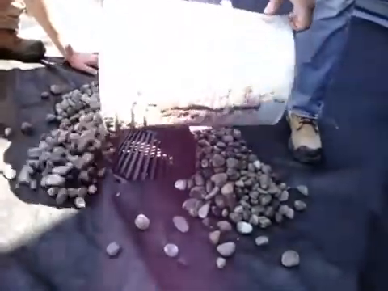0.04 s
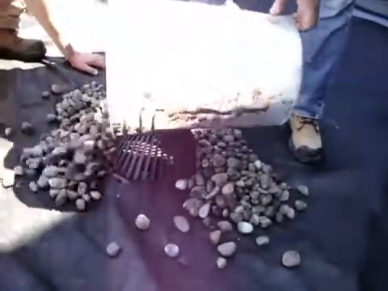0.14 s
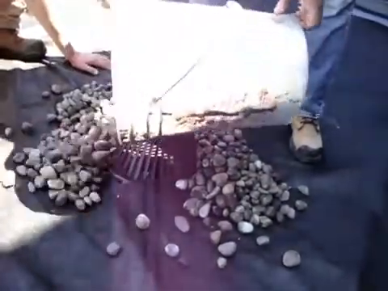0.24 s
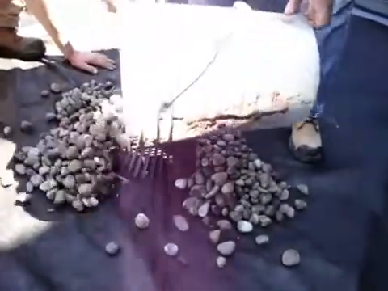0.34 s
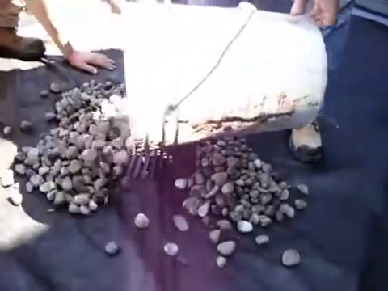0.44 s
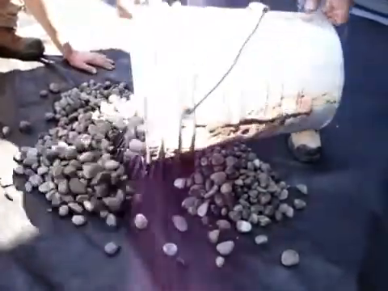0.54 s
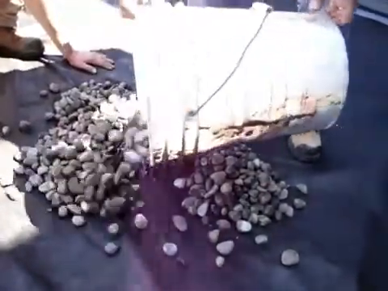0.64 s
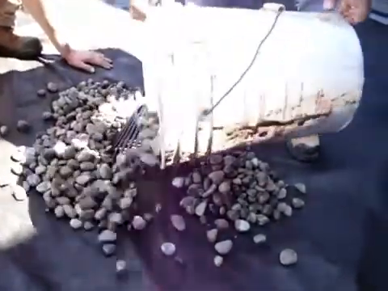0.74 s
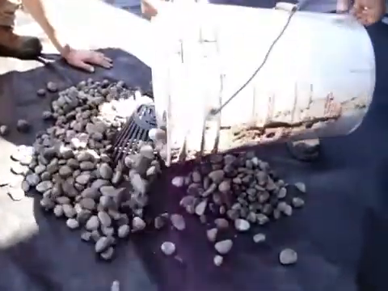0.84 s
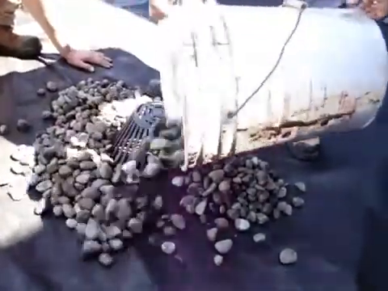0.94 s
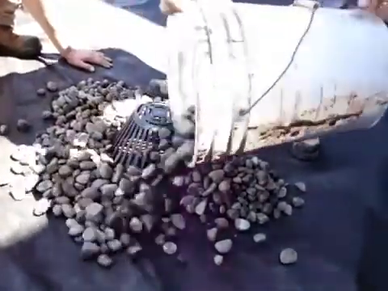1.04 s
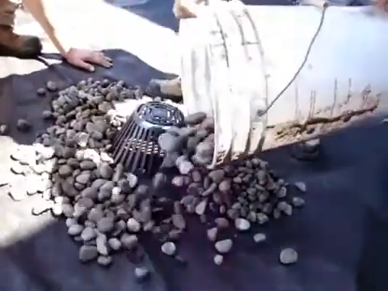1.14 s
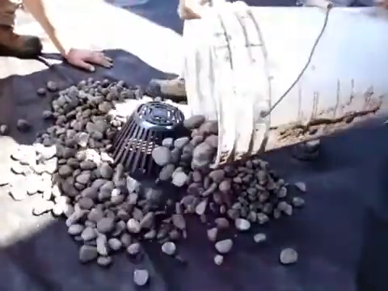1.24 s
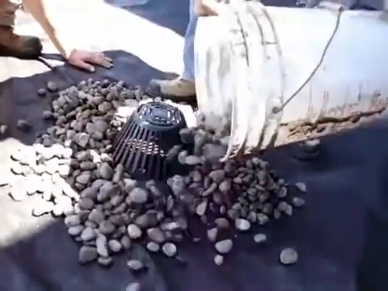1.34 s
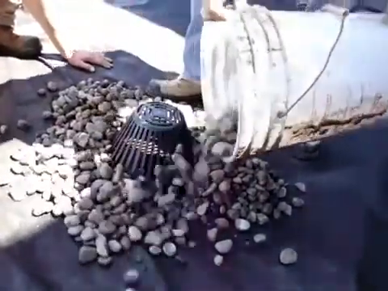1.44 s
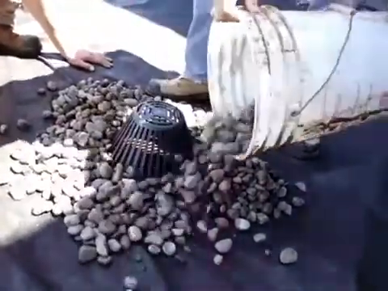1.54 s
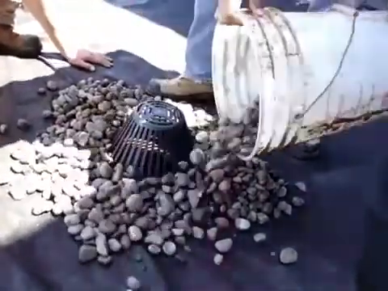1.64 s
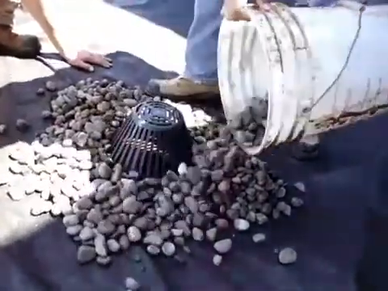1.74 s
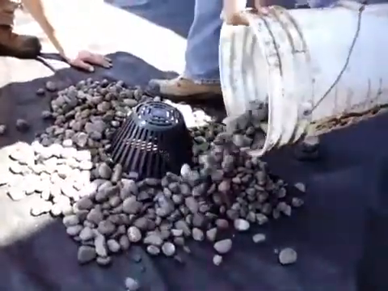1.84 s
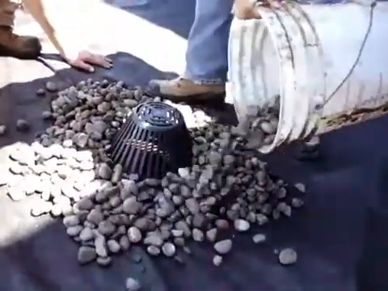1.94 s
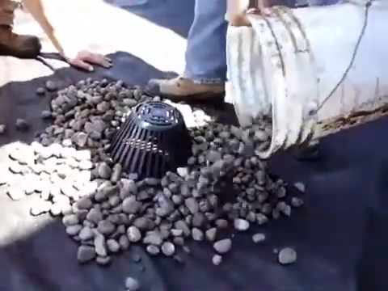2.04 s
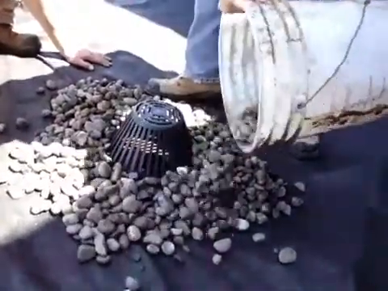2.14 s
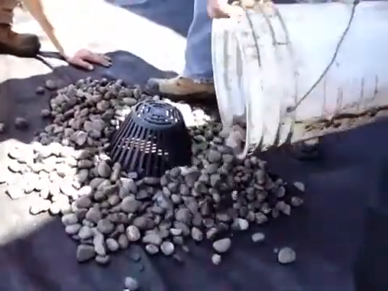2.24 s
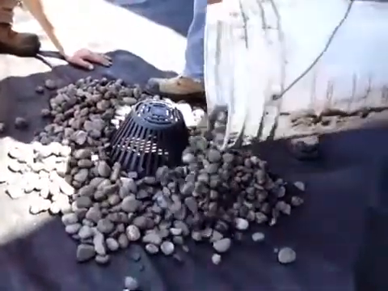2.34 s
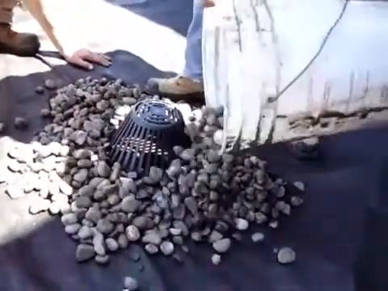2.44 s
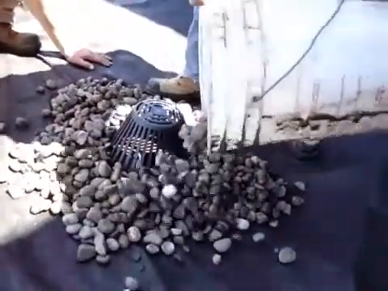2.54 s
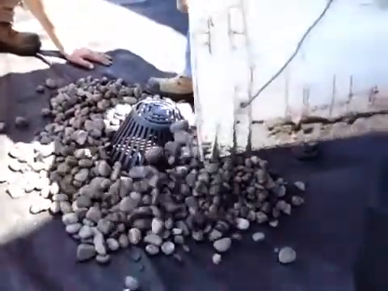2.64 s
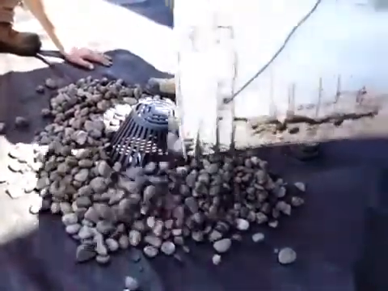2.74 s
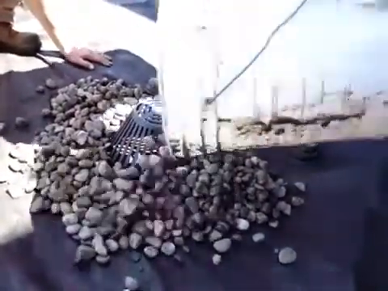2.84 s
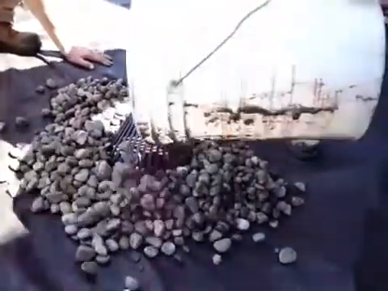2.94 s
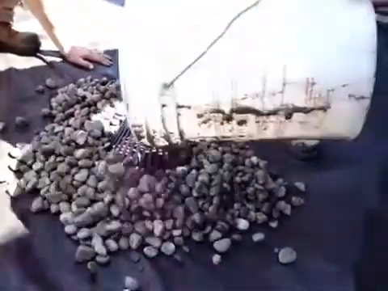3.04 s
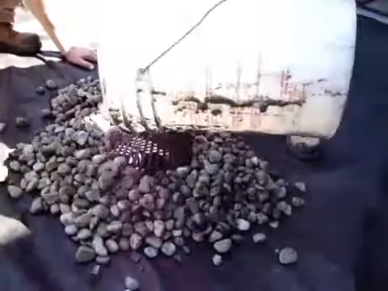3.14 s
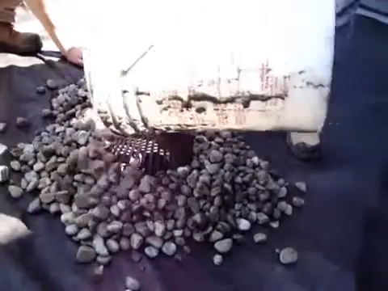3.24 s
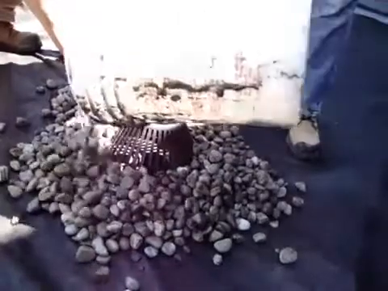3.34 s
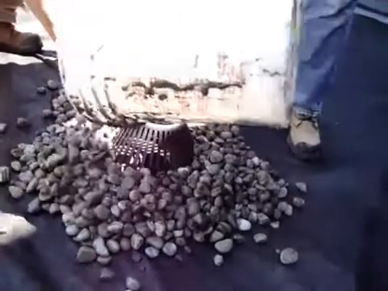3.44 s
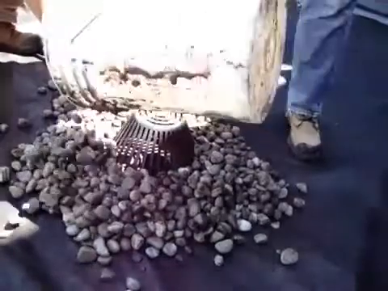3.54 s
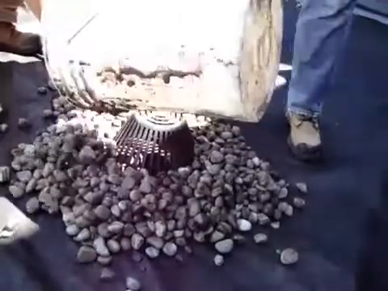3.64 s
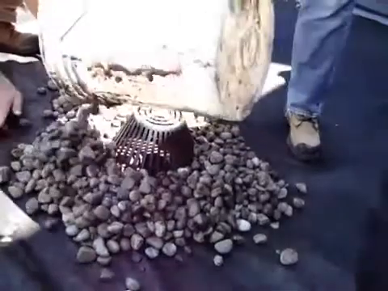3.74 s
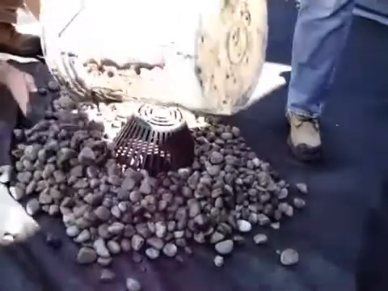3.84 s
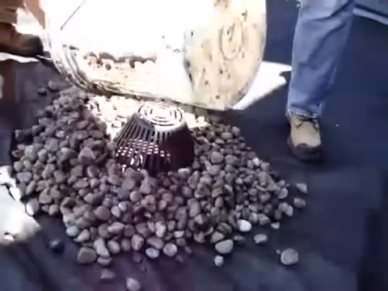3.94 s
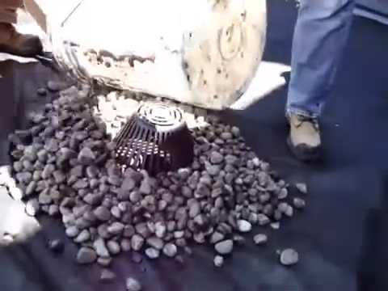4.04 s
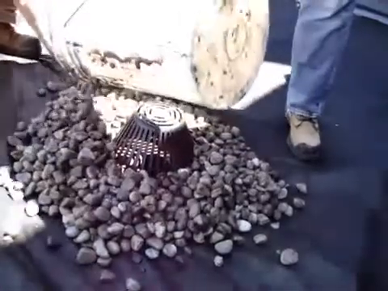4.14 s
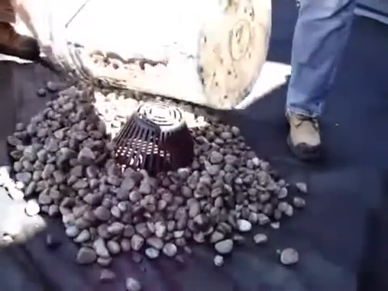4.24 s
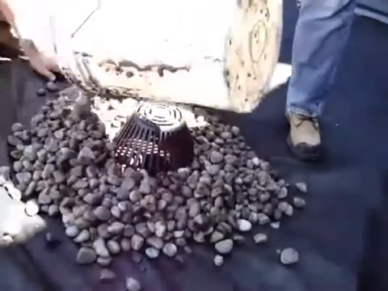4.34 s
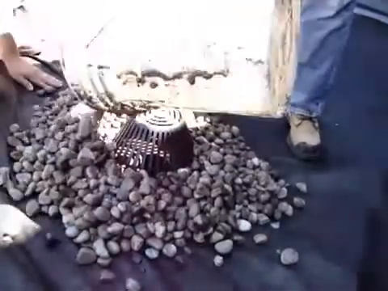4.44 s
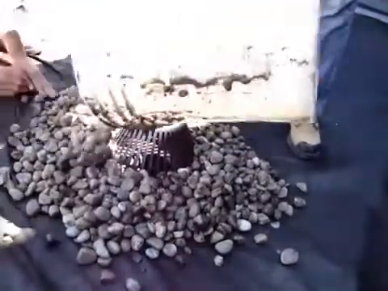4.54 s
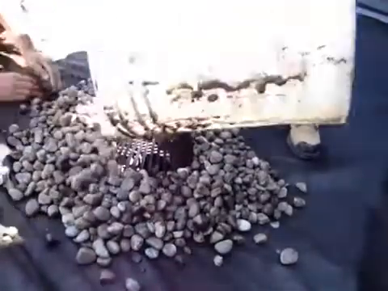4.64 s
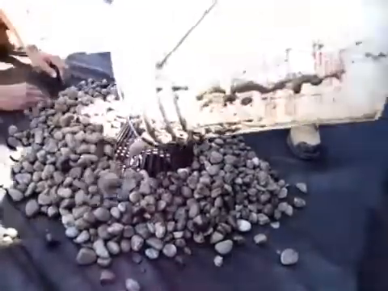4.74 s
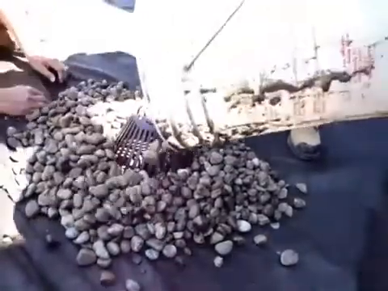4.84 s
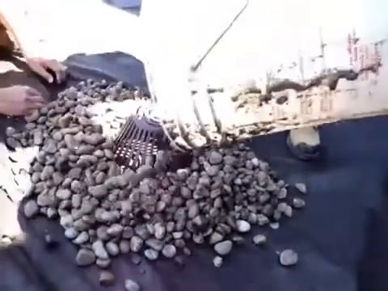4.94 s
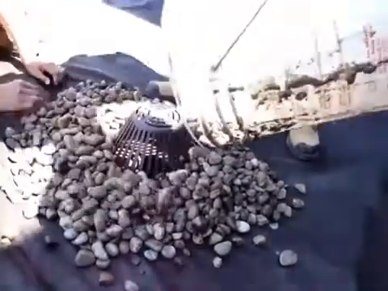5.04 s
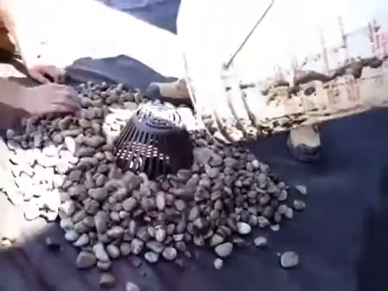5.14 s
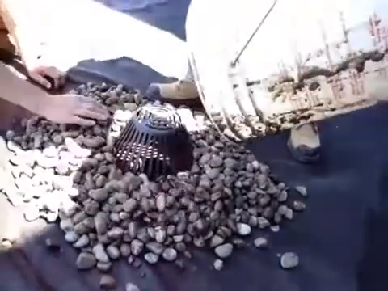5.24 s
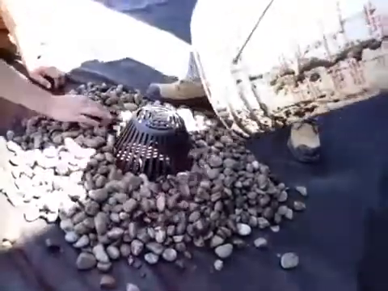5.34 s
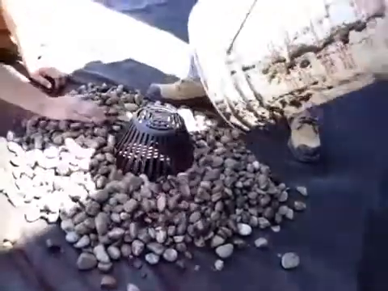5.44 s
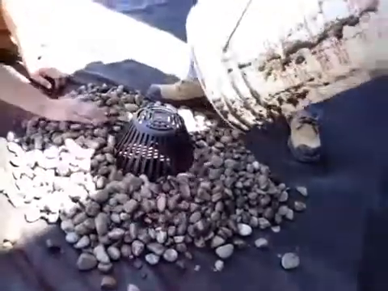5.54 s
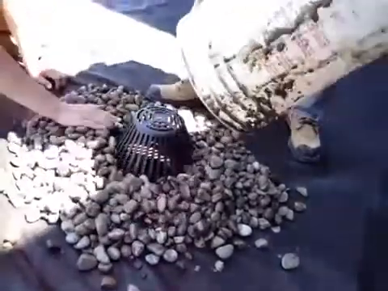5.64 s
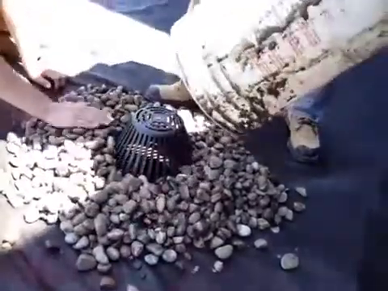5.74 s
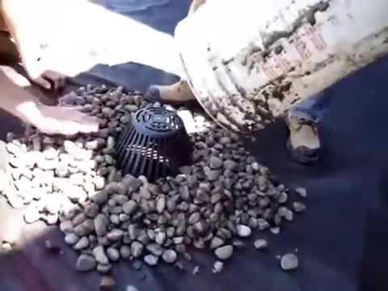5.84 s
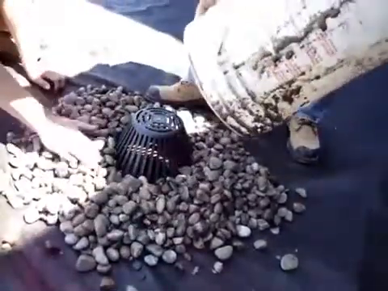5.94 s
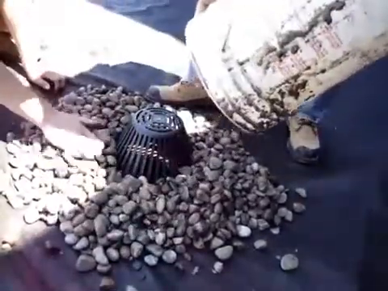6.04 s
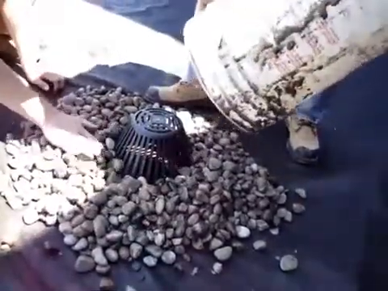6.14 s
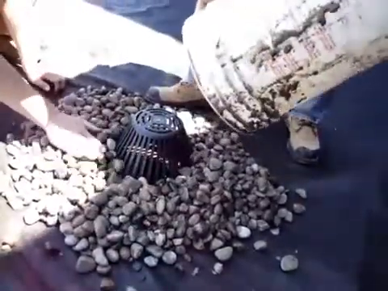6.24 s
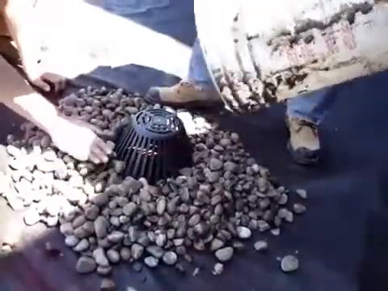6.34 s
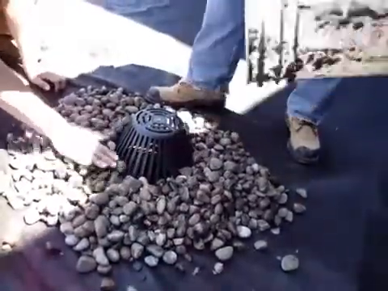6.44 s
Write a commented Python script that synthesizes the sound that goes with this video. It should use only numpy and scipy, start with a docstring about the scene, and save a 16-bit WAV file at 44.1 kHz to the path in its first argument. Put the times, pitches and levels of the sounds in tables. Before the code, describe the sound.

Already under way, a heavy pour of pebbles rattles over a plastic bucket's lip and lands on other stones with hard, sharp clacks. Plastic tocks and hollow rumbling come in bursts, strongest early, near two and a half seconds and just past four. The clatter dwindles to stray clicks, then the bucket is shaken, spitting out dry grit. Close microphone, open air, almost no echo, dull extreme top.

```python
"""Outdoors, round a drain: river stones slide out of a tilted plastic bucket and clatter onto a pile.
Bucket: random touches ring patches of wall as the load surges; single stones knock; shaken grit ends it.
Pile: sharp contact pulses with scatter make the clatter and hard clacks; sparse narrow ticks lie on top.
Ground: low noise follows the clatter; clumps thump. Behind: short scatter, air noise and a faint hum.
"""
import sys
import numpy as np
from scipy import signal
from scipy.fft import rfft, irfft
from scipy.io import wavfile
from scipy.ndimage import uniform_filter1d

SR = 44100
rng = np.random.default_rng(int(sys.argv[2]) if len(sys.argv) > 2 else 0)


def dump_mix(stems):
    """Bounce the given channels to the path in sys.argv[1] as a 16-bit WAV at rate SR."""
    frames = np.atleast_2d(stems).T  # one column per channel
    limited = np.clip(frames, -1, 1)  # hard clip at full scale
    pcm = np.round(limited * 32767).astype(np.int16)
    wavfile.write(sys.argv[1], SR, pcm)


N = 287071
TIME_S = np.arange(N) / SR

# steady flow over the bucket lip: start_s, level_db
BUCKET_FLOW = [(0.0, -33), (0.34, -36), (0.58, -35), (1.25, -33.5), (1.61, -42), (2.28, -45), (2.46, -28.5),
               (2.81, -39), (3.22, -37), (3.62, -45), (4.22, -30), (4.33, -30.5), (4.56, -37),
               (5.14, -39.5), (5.79, -51), (5.94, -43.5), (6.12, -38.5), (6.5, -39.5)]
FLOW_RUMBLE_DB, FLOW_SCRAPE_DB = -1.04, -3.36  # added to the flow level for each layer
# load slips and sticks again: crest_s, rumble_db, scrape_db, half_length_s
LOAD_SLIPS = [(0.243, -37, -44, 0.022), (0.46, -34.5, -34.5, 0.059), (0.607, -36, -32, 0.072),
              (0.757, -31, -46, 0.032), (0.854, -29.5, -49, 0.0068), (0.936, -29, -39, 0.022),
              (1.003, -40, -36.5, 0.051), (1.204, -34.5, -33.5, 0.058), (1.346, -27, -25.5, 0.0052),
              (1.454, -31.5, -37, 0.01), (1.64, -38, -39, 0.043), (1.88, -36.5, -34.5, 0.06),
              (2.055, -37, -38, 0.051), (2.292, -29.5, -31.5, 0.04), (2.46, -29.5, -33, 0.064),
              (2.662, -30.5, -33, 0.013), (2.913, -45, -61, 0.015), (3.054, -32.5, -33, 0.033),
              (3.265, -35.5, -35, 0.037), (3.458, -33.5, -35, 0.028), (3.673, -35.5, -39, 0.049),
              (3.866, -33.5, -33, 0.055), (4.024, -30.5, -31.5, 0.037), (4.415, -35.5, -36.5, 0.091),
              (4.848, -40, -38, 0.022), (5.356, -41.5, -46, 0.045), (5.565, -44.5, -41.5, 0.063),
              (5.633, -42, -40, 0.02), (5.755, -44.5, -45.5, 0.028)]
# wall pitch, low under a heavy load, high where stones run fast over the bare lip: time_s, pitch_hz
WALL_PITCH_CURVE = [(0, 860), (.7, 910), (1.3, 1000), (1.9, 1090), (2.3, 1130), (2.5, 1200), (2.9, 910),
                    (3.5, 960), (4.1, 940), (4.7, 1030), (6.5, 990)]
# hollowness as the bucket turns and empties: time_s, ringing_db
HOLLOW_CURVE = [(0, -48), (2.2, 9), (2.5, -3), (3.2, -17), (3.7, 11.5), (4.1, 5.5), (4.45, -2), (4.7, -15),
                (6.5, -24)]
# air modes of the bucket: pitch_hz, width_hz, gain_db
BUCKET_MODES = [(200, 6, 0), (597, 350, -8.5), (1000, 120, 2), (1400, 330, -8), (1610, 70, 1.5),
                (2030, 89, -4.5), (2657, 76, -9), (2980, 33, -17), (3750, 120, -34)]
# colour of the rumble on the wall: freq_hz, density_db
RUMBLE_SPECTRUM = [(30, -47.5), (110, -28.5), (165, -22), (205, -15), (290, -14.5), (420, -6.5),
                   (530, -4.5), (680, -1.5), (1000, -3.5), (1350, 1), (1800, -15.5), (3000, -31),
                   (8000, -41)]
# colour of the scraping: freq_hz, density_db
SCRAPE_SPECTRUM = [(150, -49), (600, -54.5), (1100, 11), (1500, 13), (2100, 15.5), (2900, 12.5), (4500, 7),
                   (7000, -86), (10000, -33)]
# stone on bucket wall: start_s, level_db, pitch_hz, cycles_to_crest
WALL_KNOCKS = [(0.052, -15.5, 834, 1.3), (.203, -19.5, 834, 1.4), (0.227, -16, 1270, 2.5),
               (.374, -15.5, 784, 0.64), (.473, -15.5, 1094, 2.3), (.551, -18, 696, 1),
               (.567, -14.5, 674, 2), (.574, -8, 835, 1.2), (.577, -17, 1390, 3), (.591, -16, 825, 1.1),
               (.609, -12, 777, 1.9), (.652, -25, 804, 1.2), (.68, -16.5, 794, 1.7), (.712, -18, 825, 2.1),
               (.755, -20, 764, 1.8), (.757, -22, 1500, 2), (.766, -16.5, 715, 0.99),
               (0.923, -12, 1970, 1.8), (0.928, -13, 1540, 1.6), (.928, -16, 860, 2.2),
               (.943, -24.5, 690, 2.5), (1.062, -19, 1030, 1.8), (1.138, -14, 810, 1.3),
               (1.174, -15.5, 1050, 1.2), (1.182, -17, 780, 1.7), (1.216, -20, 810, 1.7),
               (1.243, -17, 1310, 1.3), (1.339, -17, 1330, 2.1), (1.389, -18.5, 846, 2.1),
               (1.556, -16.5, 940, 1.6), (1.606, -21.5, 1300, 1.9), (2.14, -16.5, 1610, 0.94),
               (2.421, -16, 1350, 1.1), (2.443, -13, 1360, 1.1), (2.459, -13, 1160, 0.9),
               (2.487, -14, 1400, 1.3), (2.494, -12.5, 1890, 1.5), (2.496, -16, 1000, 1.5),
               (3.366, -24, 607, 1.3), (3.566, -18.5, 587, 0.77), (4.396, -16, 1036, 3.9),
               (5.259, -19.5, 1220, 1.6), (5.873, -26, 1030, 2.1), (5.984, -20, 923, 1.2),
               (6.189, -15, 1500, 1.2), (6.349, -11, 2720, 1.4), (6.351, -20, 1000, 3.7),
               (6.358, -23, 2050, 4), (6.408, -29, 460, 0.93)]
# shakes of the bucket: crest_s, level_db, swell_s, fade_s, bucket_ring_db
BUCKET_SHAKES = [(5.642, -33.5, 0.0058, 0.016, -1), (5.868, -32, 0.0054, 0.0057, 12),
                 (5.882, -30.5, 0.0068, 0.0063, 14), (5.986, -28.5, 0.017, 0.0072, 9.5),
                 (6.075, -32, 0.03, 0.026, 8), (6.124, -35, 0.0063, 0.0044, -4),
                 (6.188, -27, 0.01, 0.0082, -2), (6.265, -33, 0.0022, 0.0035, -2),
                 (6.306, -28, 0.0021, 0.0055, -16), (6.32, -28.5, 0.0031, 0.0058, 6),
                 (6.348, -24.5, 0.002, 0.007, 7), (6.485, -38.5, 0.0037, 0.024, -2)]
# colour of the shaken grit: freq_hz, density_db
GRIT_SPECTRUM = [(50, -25), (200, -25), (450, -11.5), (800, -7.5), (2000, -0.5), (4500, 3), (7000, -1.5),
                 (10000, -10.5)]

# hardest hits of stone on stone: start_s, level_db, pitch_hz
STONE_CLACKS = [(0.014, -8, 5850), (0.041, -14, 5970), (0.0778, -4, 5000), (0.0847, -14.5, 5170),
                (0.1373, -9, 5530), (0.167, -10, 4500), (0.176, -12, 5900), (0.2005, -7, 5500),
                (0.2343, -15, 5200), (0.286, -10.5, 4830), (0.3135, -11, 5140), (0.3457, -9, 5040),
                (0.3616, -13.5, 5500), (0.365, -8, 5100), (0.398, -9.5, 4850), (0.429, -17, 5200),
                (0.4925, -16, 5000), (0.5077, -6.5, 4800), (0.5197, -7, 4800), (0.5392, -10.5, 4600),
                (0.5537, -11.5, 5000), (0.5667, -15, 4540), (0.5846, -8, 5470), (0.608, -10.5, 4690),
                (0.6408, -12.5, 5250), (0.676, -9.5, 4480), (0.7074, -14, 5500), (0.733, -12.5, 5610),
                (0.745, -11, 5230), (0.7535, -10, 5450), (0.761, -6.5, 4500), (0.785, -11.5, 4880),
                (0.7957, -7, 5500), (0.818, -11.5, 4340), (0.842, -18, 5290), (0.8506, -18, 5240),
                (0.881, -13.5, 5800), (0.8963, -12, 5310), (0.9224, -8.5, 5350), (0.929, -14, 4360),
                (0.9427, -12, 4420), (0.9665, -8.5, 5300), (0.9893, -12.5, 4810), (1.062, -10.5, 5500),
                (1.0683, -10, 5070), (1.1237, -6, 4200), (1.1383, -10, 4810), (1.1503, -13, 5200),
                (1.2056, -10, 4140), (1.2252, -19, 4800), (1.2666, -10.5, 4160), (1.2914, -6.5, 4660),
                (1.306, -11, 4600), (1.328, -7.5, 5660), (1.3324, -10, 6090), (1.3523, -8.5, 4940),
                (1.3614, -7.5, 5090), (1.368, -14.5, 5200), (1.385, -9, 4900), (1.405, -9.5, 5050),
                (1.434, -12, 4320), (1.4577, -15, 4600), (1.4665, -15.5, 5790), (1.4734, -9.5, 5060),
                (1.494, -13, 4860), (1.5198, -9.5, 5750), (1.537, -17, 5130), (1.5517, -11, 5500),
                (1.5578, -17.5, 6950), (1.6395, -10.5, 5000), (1.664, -18, 4940), (1.716, -17.5, 5500),
                (1.7295, -8.5, 5700), (1.7435, -21.5, 5700), (1.749, -9.5, 6230), (1.779, -11.5, 4800),
                (1.8175, -9, 4600), (1.8635, -12, 5600), (1.875, -14, 5200), (1.9374, -9, 4530),
                (1.9491, -8.5, 3900), (1.9605, -22, 5040), (1.9811, -11, 5770), (2.004, -10.5, 6200),
                (2.0786, -13, 5330), (2.098, -17.5, 4340), (2.139, -9, 4820), (2.1516, -9.5, 5300),
                (2.178, -13.5, 4670), (2.1966, -9.5, 5530), (2.209, -12, 4750), (2.4092, -11, 4800),
                (2.5057, -15.5, 6900), (2.532, -11, 4770), (2.5453, -13, 5170), (2.5706, -15.5, 5240),
                (2.6122, -8.5, 4930), (2.6192, -5.5, 4740), (2.6445, -17, 5970), (2.6853, -15.5, 5270),
                (2.695, -17.5, 6030), (2.7015, -15, 5140), (2.7092, -12.5, 5800), (2.758, -8.5, 5070),
                (2.763, -12.5, 5700), (2.782, -9.5, 4830), (2.7955, -7.5, 5170), (2.8033, -11, 5600),
                (2.8153, -16, 5470), (2.845, -18, 5100), (2.8861, -16, 4660), (2.9415, -8, 4960),
                (2.97, -17.5, 5530), (2.9873, -11.5, 4900), (2.997, -11.5, 5170), (3.0833, -12.5, 5840),
                (3.127, -14.5, 5770), (3.153, -14.5, 6000), (3.162, -11.5, 4860), (3.178, -10.5, 4100),
                (3.188, -10.5, 6000), (3.2124, -10, 5500), (3.2281, -15, 5800), (3.252, -9, 5500),
                (3.261, -17.5, 6150), (3.279, -8.5, 6330), (3.293, -13, 5200), (3.3447, -13.5, 6640),
                (3.368, -13, 5600), (3.3725, -13, 5200), (3.4269, -10, 5800), (3.4504, -12.5, 5350),
                (3.4778, -11.5, 5700), (3.5, -14, 5800), (3.5327, -12.5, 5760), (3.55, -11, 5060),
                (3.5565, -19, 4880), (3.606, -14, 6060), (3.6705, -9, 5790), (3.7403, -9, 4700),
                (3.7618, -8.5, 4400), (3.799, -11.5, 5000), (3.829, -16, 4900), (3.9, -17.5, 4230),
                (3.9256, -12, 4730), (3.9599, -8.5, 3840), (4.0386, -13.5, 4770), (4.057, -13, 4800),
                (4.073, -8.5, 5600), (4.1125, -15.5, 5400), (4.119, -6.5, 5650), (4.1342, -7.5, 5600),
                (4.174, -8, 3950), (4.23, -10, 4800), (4.245, -17, 5320), (4.2722, -10, 5220),
                (4.2952, -4.5, 4630), (4.323, -13, 5480), (4.338, -7, 4480), (4.411, -6.5, 6000),
                (4.4726, -11, 5160), (4.508, -9, 5860), (4.525, -18, 5100), (4.5451, -7.5, 5040),
                (4.58, -18, 4470), (4.6253, -19, 5170), (4.6397, -14.5, 5170), (4.6725, -8.5, 5900),
                (4.7122, -13.5, 5590), (4.718, -17.5, 6540), (4.732, -12.5, 6000), (4.7596, -10, 4380),
                (4.7728, -13.5, 5530), (4.7968, -9, 5040), (4.8074, -13, 4830), (4.8288, -20, 4810),
                (4.833, -12.5, 5400), (4.8498, -14.5, 4980), (4.8737, -9.5, 3980), (4.8835, -12, 5600),
                (4.896, -14, 4210), (4.913, -16, 5700), (4.9463, -11, 5350), (4.9618, -19, 5170),
                (4.9788, -15, 6430), (4.9927, -13.5, 5330), (5.0112, -14.5, 6000), (5.0401, -8, 5000),
                (5.0774, -16.5, 6700), (5.0983, -14, 6760), (5.107, -13.5, 6600), (5.131, -20, 6000),
                (5.1565, -15.5, 4020), (5.1848, -14, 5760), (5.22, -10.5, 4580), (5.25, -10, 4240),
                (5.2835, -18, 5700), (5.301, -11, 4870), (5.3556, -12, 7140), (5.385, -30, 4500),
                (5.4545, -17, 3400), (5.5386, -10.5, 5450), (5.5666, -9.5, 5440), (5.5964, -21.5, 4150),
                (6.1263, -17, 4960), (6.2655, -18.5, 4520), (6.3057, -18, 3770), (6.3452, -14, 4800),
                (6.482, -15.5, 6100)]
RING_DB, RING_S = -13.5, 0.0015  # ring of the hollow between stones: level re the hit, decay
BOUNCE_DB, BOUNCE_S = -15.5, (0.00034, 0.00086)  # off the pile: level re the pulse, delay range
NEAR_DB, NEAR_S = -9.5, 0.0006  # scatter among the nearest stones: level, decay
FAR_DB, FAR_S = -19.5, 0.004  # scatter across the whole pile: level, decay
FAR_SPREAD_DB = 4  # far scatter level varies at random from snap to snap, -0.5 to 1.5 times this
BAND_SHIFT_OCTAVES, BAND_RELATIVE_WIDTH = 0.55, 0.33  # scatter band re the snap pitch

# batches of stones spilling onto the pile: start_s, length_s, clatter_db
PILE_SPILLS = [(0.0, 0.032, -22.5), (0.15, 0.101, -27.5), (0.265, 0.15, -30.5), (0.466, 0.05, -32.5),
               (0.608, 0.042, -26), (0.716, 0.098, -28.5), (0.84, 0.0083, -18), (0.896, 0.067, -25.5),
               (0.99, 0.091, -33), (1.097, 0.14, -27.5), (1.251, 0.032, -30), (1.35, 0.025, -33),
               (1.406, 0.161, -30.5), (1.578, 0.11, -33.5), (1.707, 0.071, -31), (1.813, 0.1, -34.5),
               (1.938, 0.078, -32.5), (2.026, 0.037, -33.5), (2.151, 0.033, -34), (2.25, 0.071, -32.5),
               (2.437, 0.08, -27), (2.565, 0.086, -25), (2.681, 0.037, -27.5), (2.76, 0.071, -26),
               (2.833, 0.044, -36), (2.937, 0.12, -28.5), (3.159, 0.034, -24.5), (3.183, 0.052, -34),
               (3.358, 0.043, -27), (3.416, 0.055, -43), (3.547, 0.051, -25.5), (3.756, 0.12, -29.5),
               (3.87, 0.23, -32.5), (3.947, 0.058, -26), (4.017, 0.055, -38), (4.123, 0.51, -29.5),
               (4.45, 0.082, -25), (4.585, 0.097, -40.5), (4.799, 0.0078, -27), (4.825, 0.021, -24.5),
               (4.876, .025, -35.5), (5.437, 0.027, -38.5), (5.543, 0.1, -33.5), (6.036, 0.114, -31),
               (6.16, 0.114, -30.5), (6.384, 0.052, -33.5), (6.479, 0.026, -32.5)]
SPILL_ATTACK_S, SPILL_SETTLE_S = 0.00043, 0.0039
# small stones trickling between spills: time_s, clatter_db
PILE_TRICKLE = [(0.0, -34), (0.36, -41.5), (1.41, -54), (1.59, -58.5), (2.3, -36), (2.66, -50), (2.77, -48),
                (3.44, -43), (3.56, -45), (3.87, -35.5), (4.38, -54), (4.56, -59), (4.89, -53), (5.45, -40),
                (5.79, -47), (5.96, -67), (6.08, -47.5), (6.19, -62), (6.5, -39)]
JOSTLE_DB, JOSTLE_S = -15.5, 0.0089  # clatter around a hard hit: level re the hit, decay
# grade of the load, finer at the end: time_s, touches_per_s, strength_spread_db
LOAD_GRADE = [(0, 340, 0.5), (4.4, 380, 1.5), (5.0, 200, 2.5), (5.5, 460, 3), (5.7, 770, 3), (6.5, 2700, 8)]
# colour of the clatter: freq_hz, density_db
CLATTER_SPECTRUM = [(150, -27.5), (800, 5.5), (2000, -26), (3200, -6), (5000, -0.5), (7000, -4.5),
                    (10000, -8)]

# clumps of stones landing on the ground: start_s, level_db
GROUND_THUDS = [(0.561, -42), (0.712, -50), (0.826, -51), (1.114, -46), (1.172, -45), (2.492, -43),
                (2.589, -39), (3.176, -43), (3.36, -46), (3.472, -44), (4.412, -44), (4.596, -42),
                (4.999, -44), (5.171, -41.5), (5.559, -50)]
# colour of the ground under falling stones: freq_hz, density_db
GROUND_SPECTRUM = [(20, -1.5), (60, -12), (130, -1), (250, -4.5), (600, -35), (2000, -60)]
# colour of the outdoor air: freq_hz, density_db
AIR_SPECTRUM = [(20, -8.5), (60, 0.5), (140, -7.5), (185, -4), (240, 2.5), (320, -4.5), (700, 6),
                (1500, -4.5), (4000, -14), (10000, -37)]
HUM_HZ, HUM_FILTER_WIDTH_HZ, HUM_DB = 204.3, 19, -72.5
CUTOFF_HZ = 10200


def bucket_levels(flow_db):
    """Rumble and scrape follow the flow; each slip adds a Gaussian swell of power."""
    rumble_power = from_db(flow_db + FLOW_RUMBLE_DB) ** 2
    scrape_power = from_db(flow_db + FLOW_SCRAPE_DB) ** 2
    for crest_s, rumble_db, scrape_db, half_s in LOAD_SLIPS:
        near = slice(*np.searchsorted(TIME_S, [crest_s - 3 * half_s, crest_s + 3 * half_s]))
        swell = np.exp(-((TIME_S[near] - crest_s) / half_s) ** 2)
        rumble_power[near] += swell * from_db(rumble_db) ** 2
        scrape_power[near] += swell * from_db(scrape_db) ** 2
    return 10 * np.log10(rumble_power), 10 * np.log10(scrape_power)


def load_sliding(rumble_db, scrape_db, centre_hz, hollow_db, count=22):
    """Stones tumble along plastic; wall patches ring briefly, strongest near the load's pitch."""
    wall = evened(coloured(contacts(per_s=1200, spread_db=3.0), RUMBLE_SPECTRUM), span_s=0.083)
    patches = 0
    for hz in np.geomspace(580, 1900, count):
        nearness = np.exp(-(np.log2(hz / centre_hz) / 0.91) ** 2)
        ring = resonance(contacts(per_s=20, spread_db=3.0), hz, 0.1 * hz)
        patches = patches + nearness * rms_one(resonance(ring, hz, hz))
    rumble = wall + from_db(2.0) * evened(patches, span_s=0.056)
    hollow = from_db(hollow_db - 7.0) * in_bucket(rumble)
    rumble = evened(rumble + hollow, span_s=0.3)
    scrape = evened(coloured(contacts(per_s=1500, spread_db=2.0), SCRAPE_SPECTRUM), span_s=0.96)
    return from_db(rumble_db + 0.72) * rumble + from_db(scrape_db - 0.5) * scrape


def in_bucket(x):
    """Air modes of the bucket: parallel resonances."""
    return sum(from_db(gain_db) * resonance(x, hz, width_hz) for hz, width_hz, gain_db in BUCKET_MODES)


def knocks():
    """Single stones strike the damped wall: a blunt tock and two modes that differ from spot to spot."""
    out = np.zeros(N)
    for start_s, level_db, hz, cycles in WALL_KNOCKS:
        low = impact(hz, cycles, scatter_db=-3.5, scatter_s=0.0065, width=0.73 / cycles)
        high_hz = hz * rng.uniform(1.297, 1.5)
        high = impact(high_hz, cycles=3.7, scatter_db=1.5, scatter_s=0.0055, width=0.91)
        tock = impact(hz * 1.06, cycles=0.38, scatter_db=-3, scatter_s=0.0072, width=0.5)
        knock = from_db(level_db - 3.0) * (low + from_db(-9.0) * high + from_db(-5.5) * tock)
        # a small patch of wall radiates little below its own pitch
        highpass = signal.butter(3, 0.51 * hz, "high", fs=SR, output="sos")
        add(out, start_s, signal.sosfilt(highpass, knock))
    return out


def shaken_grit(count=28):
    """Shakes throw grit and pebbles along the wall, ringing its patches and the empty bucket."""
    grit = evened(coloured(contacts(per_s=2900, spread_db=1.7), GRIT_SPECTRUM), span_s=0.012)
    pebbles = 0
    for hz in np.geomspace(950, 3000, count):
        ring = resonance(contacts(per_s=22, spread_db=1.5), hz, 0.071 * hz)
        pebbles = pebbles + resonance(ring, hz, hz)
    rattle = grit + from_db(-6.0) * evened(pebbles, span_s=0.017)
    direct, hollow = 0, 0
    for crest_s, level_db, swell_s, fade_s, ring_db in BUCKET_SHAKES:
        age = np.maximum((crest_s - TIME_S) / swell_s, (TIME_S - crest_s) / fade_s)
        stroke = from_db(level_db) * np.exp(-np.minimum(age, 20))
        direct = direct + stroke
        hollow = hollow + from_db(ring_db) * stroke
    return from_db(1.5) * rattle * direct + in_bucket(rattle * hollow)


def snap(hz, size=1024):
    """Two pebbles meet: a sharp pressure pulse, its bounce and a brief coloured scatter; peak 1."""
    t = np.arange(size) / SR
    swing = np.pi * (hz * t - 1)
    pulse = (1 - 2 * swing ** 2) * np.exp(-swing ** 2)
    bounce = from_db(BOUNCE_DB) * np.roll(pulse, int(rng.uniform(*BOUNCE_S) * SR))
    band_hz = hz * 2 ** (BAND_SHIFT_OCTAVES * rng.uniform(-0.64, 1))
    noise = np.convolve(rng.standard_normal(size), pulse[:size // 16])[:size]
    scatter = rms_one(resonance(noise, band_hz, BAND_RELATIVE_WIDTH * band_hz))
    far_db = FAR_DB + FAR_SPREAD_DB * (2 * rng.random() - 0.5)
    dying = from_db(NEAR_DB) * np.exp(-t / NEAR_S) + from_db(far_db) * np.exp(-t / FAR_S)
    sound = pulse + bounce + dying * scatter
    return rng.choice([-1, 1]) * sound / np.abs(sound).max()


def clacks(hits, graze_db, tock_db):
    """Hard stone-on-stone hits: a light graze, the snap, a short ring and a duller tock from beneath."""
    out = np.zeros(N)
    t = TIME_S[TIME_S < 10 * RING_S]
    for start_s, level_db, hz in hits:
        add(out, start_s - rng.uniform(0.00043, 0.0035), from_db(level_db + graze_db) * snap(hz))
        add(out, start_s, from_db(level_db - 1.5) * snap(hz))
        ring_hz = hz * 2 ** rng.uniform(-0.48, 0.688)
        ring = np.sin(2 * np.pi * ring_hz * t) * np.exp(-t / RING_S)
        add(out, start_s, from_db(level_db + RING_DB) * ring)
        tock_hz = hz * rng.uniform(0.14, 0.51)
        tock = impact(tock_hz, cycles=0.58, scatter_db=-7.5, scatter_s=0.0049, width=0.75, size=1280)
        add(out, start_s, from_db(level_db + tock_db) * tock)
    # pebbles are too small to radiate bass
    return signal.sosfilt(signal.butter(2, 380, "high", fs=SR, output="sos"), out)


def pile_level(trickle_db, hits):
    """Power of the trickle, plus spills that start at once and settle, plus a rattle after hard hits."""
    power = from_db(trickle_db) ** 2
    for start_s, length_s, clatter_db in PILE_SPILLS:
        age_s = np.arange(int((length_s + 10 * SPILL_SETTLE_S) * SR)) / SR
        attack = np.minimum(age_s / SPILL_ATTACK_S, 1)
        settling = np.exp(-np.maximum(age_s - length_s, 0) / SPILL_SETTLE_S)
        add(power, start_s, (from_db(clatter_db) * attack * settling) ** 2)
    jostle = np.exp(-TIME_S[TIME_S < 10 * JOSTLE_S] / JOSTLE_S)
    for start_s, level_db, _ in hits:
        add(power, start_s, (from_db(level_db + JOSTLE_DB) * jostle) ** 2)
    return 10 * np.log10(power)


def pile_clatter(clatter_db, per_s, spread_db, count=36):
    """Pebbles of many sizes land and jostle, each size with a snap of its own."""
    touches = contacts(per_s, spread_db)
    size_index = rng.integers(0, count, N)
    clicks = 0
    for k, hz in enumerate(np.geomspace(2800, 8500, count)):
        clicks = clicks + signal.oaconvolve(touches * (size_index == k), snap(hz))[:N]
    return from_db(clatter_db - 4.5) * evened(coloured(clicks, CLATTER_SPECTRUM), span_s=0.048)


def bright_ticks(clatter_db, count=36):
    """Sparse narrow ticks, 3.4 to 9.8 kHz, random in time, following the clatter level."""
    ticks = 0
    for hz in np.geomspace(3400, 9800, count):
        ticks = ticks + resonance(contacts(per_s=4.5, spread_db=2.0), hz, 0.026 * hz)
    return from_db(clatter_db - 14) * evened(ticks, span_s=0.18)


def ground_thuds(clatter_db):
    """Ground takes the weight of falling stones as low noise; a clump lands with a dead thump."""
    out = from_db(clatter_db - 40.0) * coloured(rng.standard_normal(N), GROUND_SPECTRUM)
    for start_s, level_db in GROUND_THUDS:
        thud_hz = rng.uniform(83, 125)
        thud = impact(thud_hz, cycles=0.2, scatter_db=1.0, scatter_s=0.024, width=3.6)
        add(out, start_s, from_db(level_db + 1.5) * thud)
    return out


def yard(x, wet_db, t60_s, size=16384):
    """Faint, dull scatter from the ground and things around: decaying noise after a 4 ms gap."""
    t = np.arange(size) / SR
    decay = from_db(-60 * t / t60_s) * (t > 0.004)
    tail = resonance(rng.standard_normal(size), 1200, 3400) * decay
    return x + from_db(wet_db) * signal.oaconvolve(x, tail / np.linalg.norm(tail))[:N]


def background():
    """Quiet outdoor air as coloured noise; a faint wavering hum as narrow-band noise."""
    hum = rng.standard_normal(N)
    for _ in range(2):
        hum = resonance(hum, HUM_HZ, HUM_FILTER_WIDTH_HZ)
    air = from_db(-59) * coloured(rng.standard_normal(N), AIR_SPECTRUM)
    return air + from_db(HUM_DB) * rms_one(hum)


def contacts(per_s, spread_db):
    """Random touches, many weak and a few strong."""
    sizes = from_db(spread_db * np.minimum(rng.exponential(1, N), 4)) * rng.choice([-1, 1], N)
    return sizes * (rng.random(N) < per_s / SR)


def impact(hz, cycles, scatter_db, scatter_s, width, size=3072):
    """A few cycles from the contact, then scatter among things nearby (width re hz); peak 1."""
    t = np.arange(size) / SR
    age = t * hz / cycles
    direct = age * np.exp(1 - age) * np.sin(2 * np.pi * hz * t + rng.uniform(0, 2 * np.pi))
    noise = rms_one(resonance(rng.standard_normal(size), hz, width * hz))
    scatter = noise * (1 - np.exp(-age / 2)) * np.exp(-t / scatter_s)
    sound = direct + from_db(scatter_db) * scatter
    return sound / np.abs(sound).max()


def resonance(x, hz, width_hz):
    """Two-pole resonance, gain 1 on top."""
    r = np.exp(-np.pi * width_hz / SR)
    zeros = np.array([1, 0, -1]) * (1 - r * r) / 2
    poles = [1, -2 * r * np.cos(2 * np.pi * hz / SR), r * r]
    return signal.lfilter(zeros, poles, x + 1e-18)


def coloured(x, spectrum, size=4096):
    """Causal (minimum-phase) filter with the given spectrum; rms 1."""
    hz, db = np.transpose(spectrum)
    grid_hz = np.maximum(np.arange(size // 2 + 1) * SR / size, 1)
    gain = from_db(np.interp(np.log(grid_hz), np.log(hz), db))
    cepstrum = irfft(np.log(gain))
    response = irfft(np.exp(rfft(2 * cepstrum[:size // 2], size) - cepstrum[0]))
    return rms_one(signal.oaconvolve(x, response)[:N])


def evened(x, span_s):
    """Hold the level steady over span_s and keep the finer grain."""
    power = uniform_filter1d(x ** 2, int(span_s * SR) + 1)
    power = uniform_filter1d(power, int(span_s * SR / 2) + 1)
    return x / np.sqrt(np.maximum(power, 0) + 1e-4 * np.mean(x ** 2))


def from_db(db):
    """Amplitude ratio."""
    return 10 ** (np.asarray(db) / 20)


def rms_one(x):
    """Scale to rms 1."""
    return x / np.sqrt(np.mean(x ** 2) + 1e-20)


def in_time(rows):
    """Columns of a curve table, one value a sample."""
    time_s, *columns = np.transpose(rows)
    return [np.interp(TIME_S, time_s, column) for column in columns]


def add(out, start_s, sound):
    """Mix a short sound in at start_s."""
    i = int(np.clip(round(start_s * SR), 0, N - 1))
    out[i:i + len(sound)] += sound[:N - i]


def scene():
    """Bucket, pile and ground in the open air."""
    clatter_db = pile_level(*in_time(PILE_TRICKLE), STONE_CLACKS)
    rumble_db, scrape_db = bucket_levels(*in_time(BUCKET_FLOW))
    bucket = load_sliding(rumble_db, scrape_db, *in_time(WALL_PITCH_CURVE), *in_time(HOLLOW_CURVE))
    bucket = bucket + knocks() + shaken_grit()
    pile = clacks(STONE_CLACKS, graze_db=-9.5, tock_db=-17.0)
    pile = pile + pile_clatter(clatter_db, *in_time(LOAD_GRADE)) + bright_ticks(clatter_db)
    ground = ground_thuds(clatter_db)
    return (yard(bucket + pile + ground, wet_db=-20.5, t60_s=0.012) + background())[None]


def record(dry):
    """Steep elliptic low-pass cuts the top."""
    lowpass = signal.ellip(10, 0.3, 70, CUTOFF_HZ, fs=SR, output="sos")
    return signal.sosfilt(lowpass, dry)


dry = scene()
out = record(dry)
dump_mix(out)
```